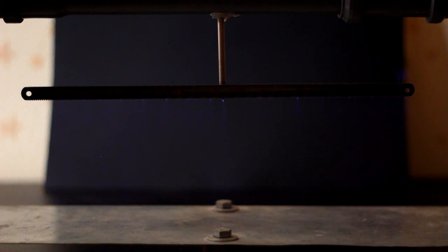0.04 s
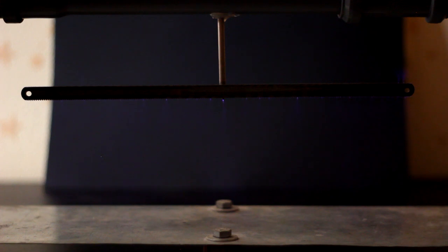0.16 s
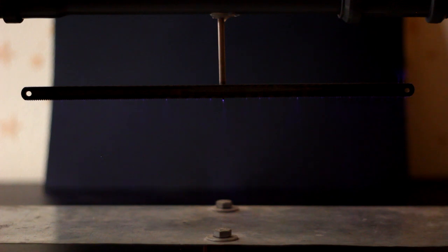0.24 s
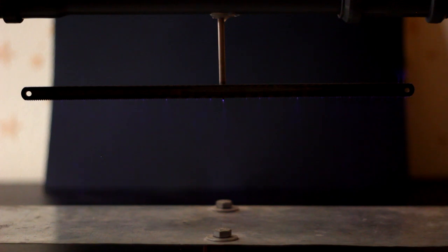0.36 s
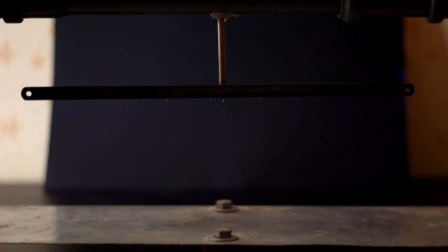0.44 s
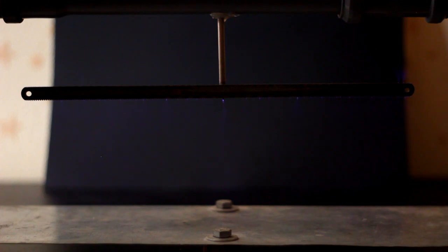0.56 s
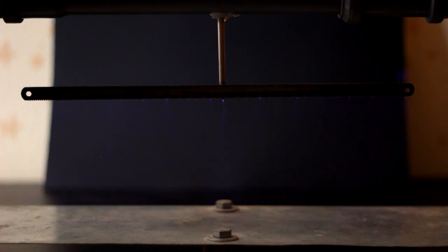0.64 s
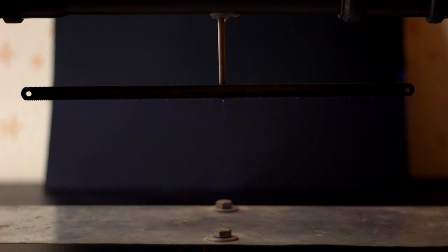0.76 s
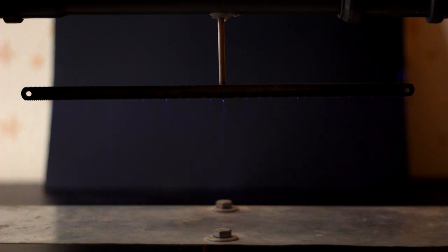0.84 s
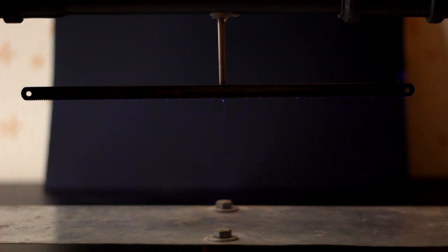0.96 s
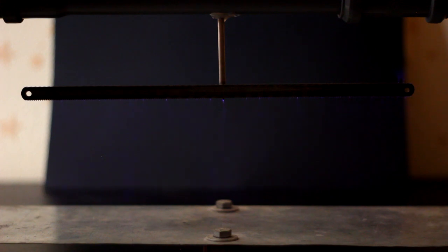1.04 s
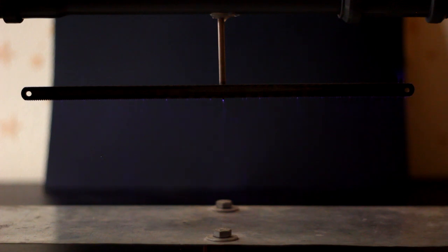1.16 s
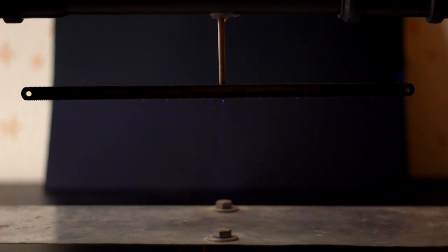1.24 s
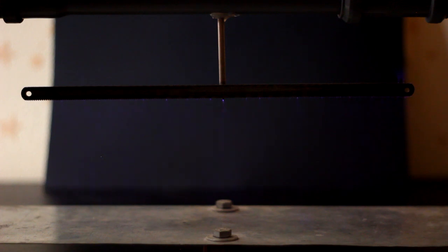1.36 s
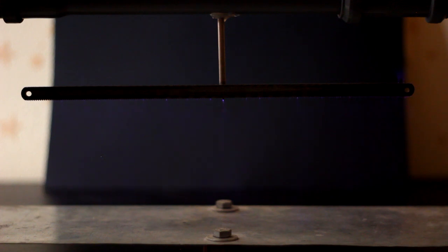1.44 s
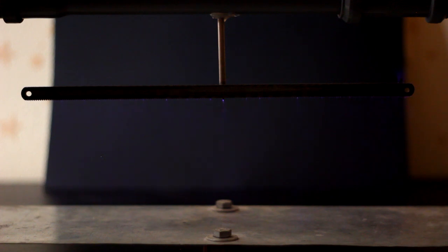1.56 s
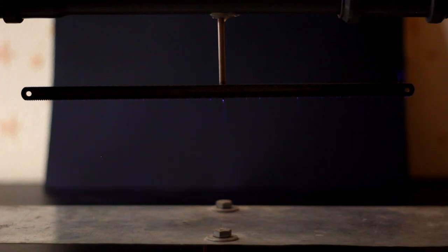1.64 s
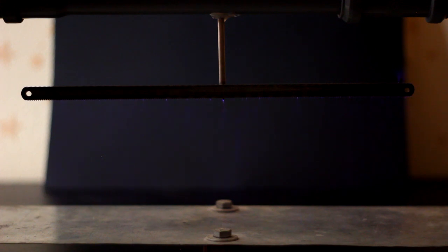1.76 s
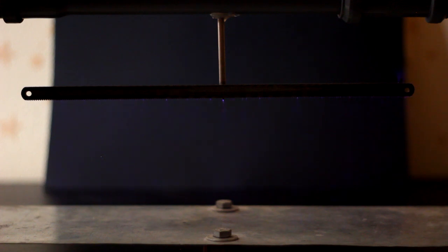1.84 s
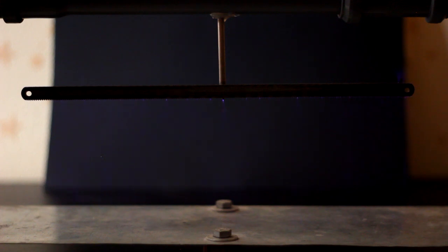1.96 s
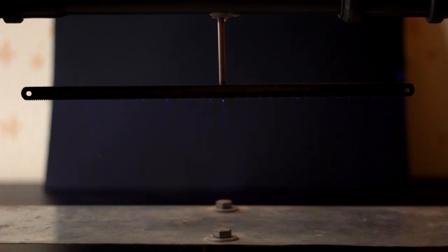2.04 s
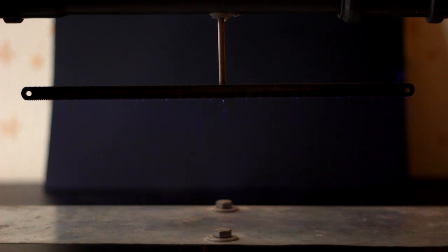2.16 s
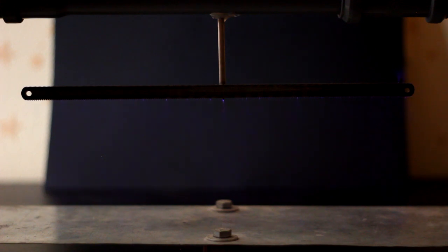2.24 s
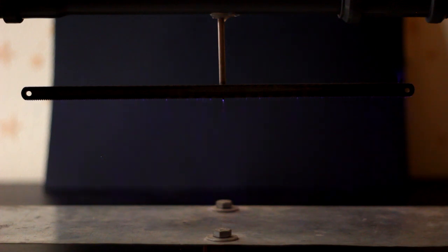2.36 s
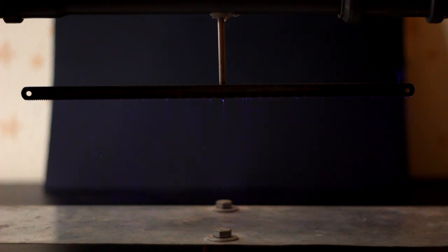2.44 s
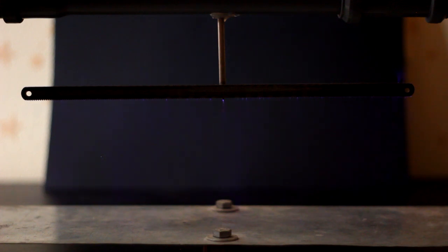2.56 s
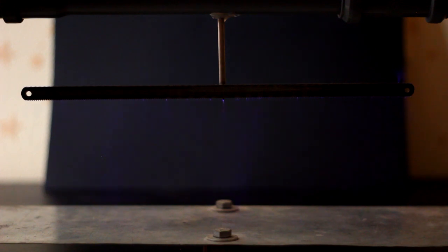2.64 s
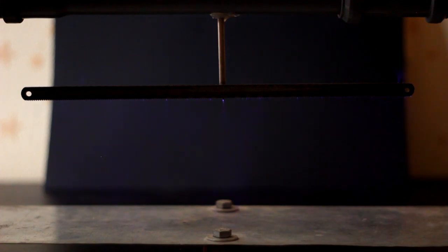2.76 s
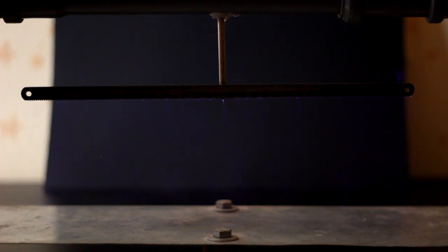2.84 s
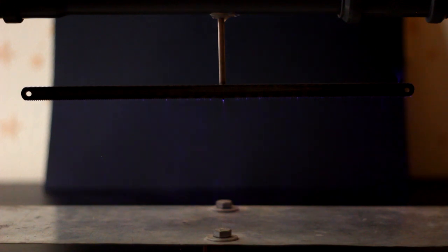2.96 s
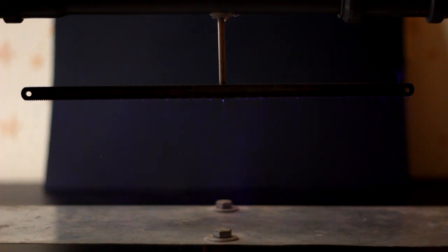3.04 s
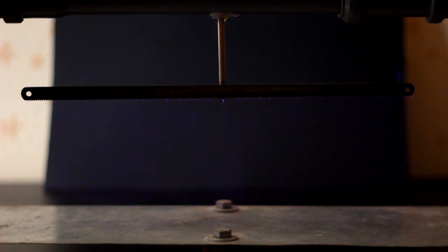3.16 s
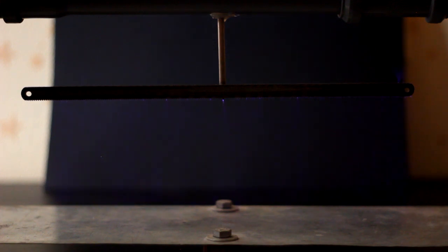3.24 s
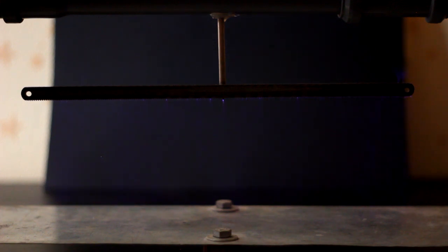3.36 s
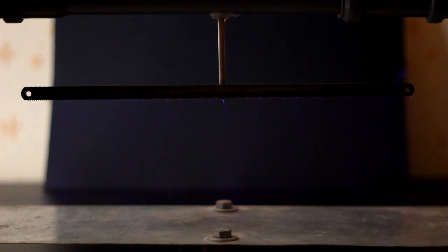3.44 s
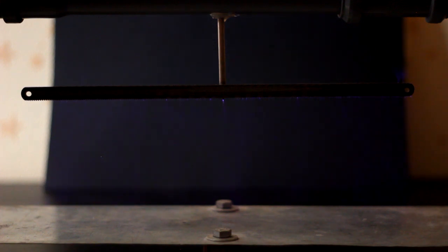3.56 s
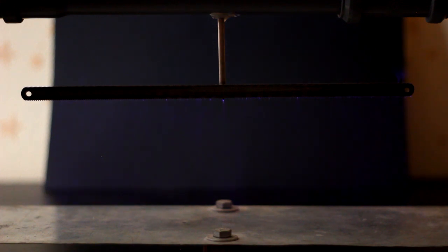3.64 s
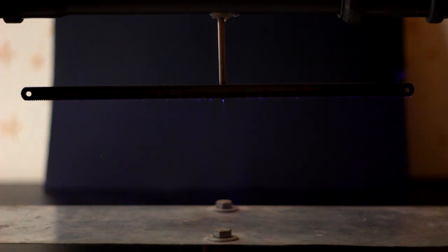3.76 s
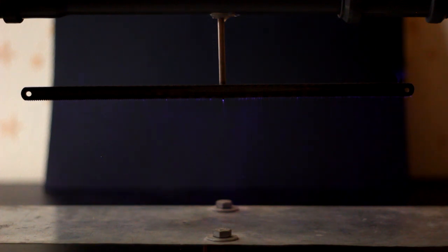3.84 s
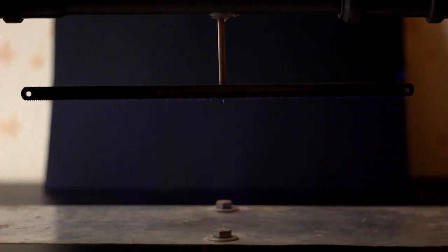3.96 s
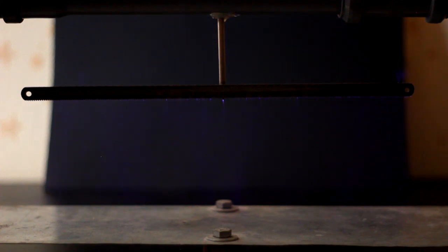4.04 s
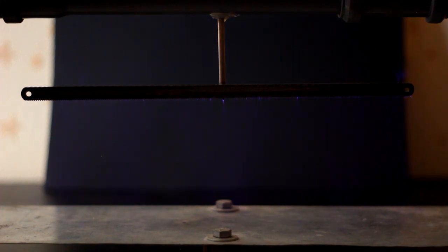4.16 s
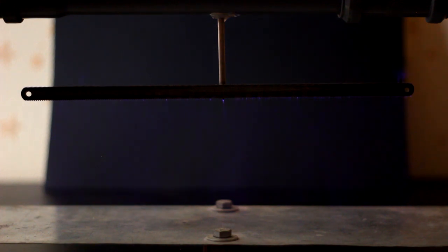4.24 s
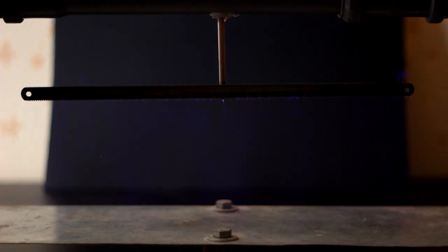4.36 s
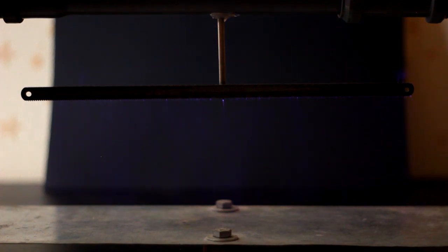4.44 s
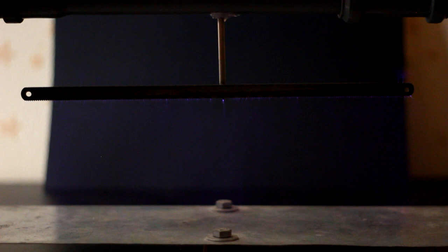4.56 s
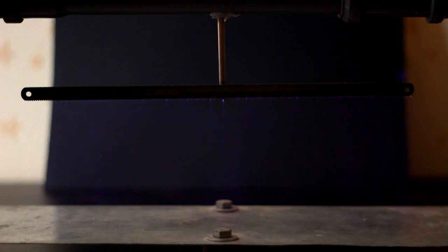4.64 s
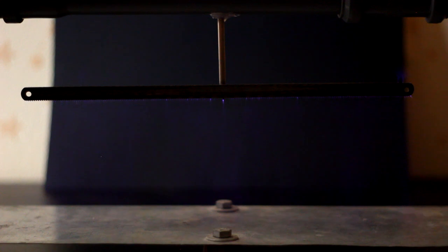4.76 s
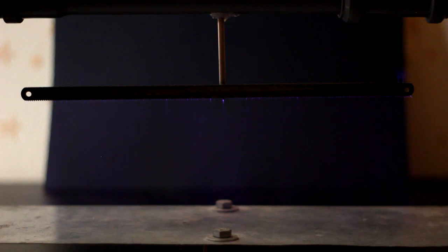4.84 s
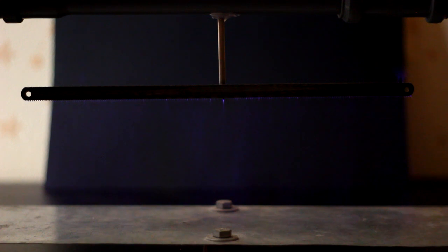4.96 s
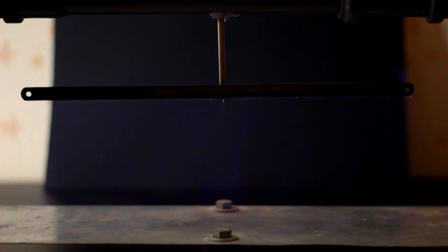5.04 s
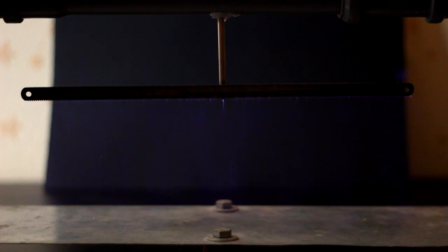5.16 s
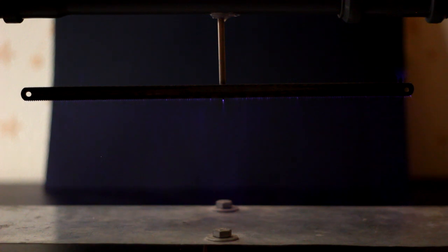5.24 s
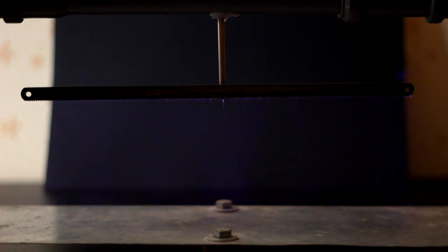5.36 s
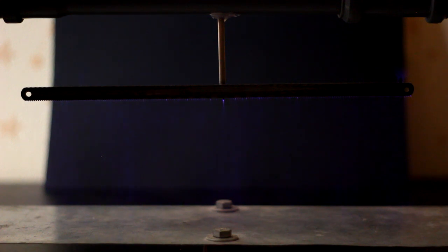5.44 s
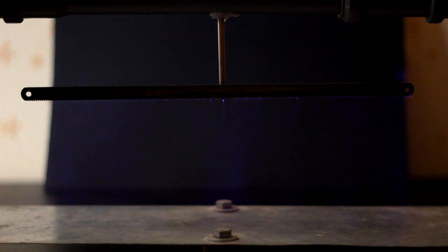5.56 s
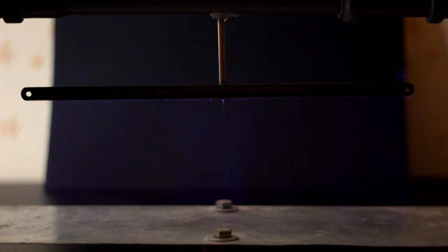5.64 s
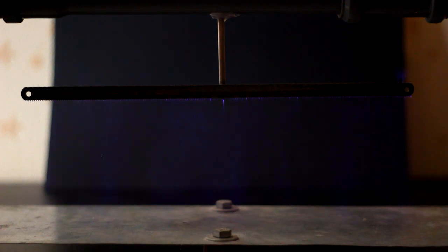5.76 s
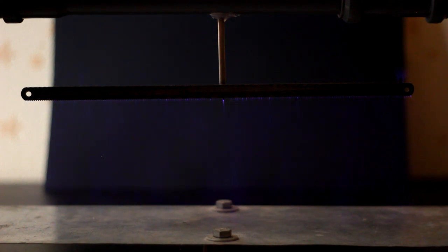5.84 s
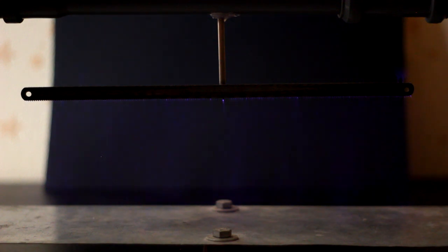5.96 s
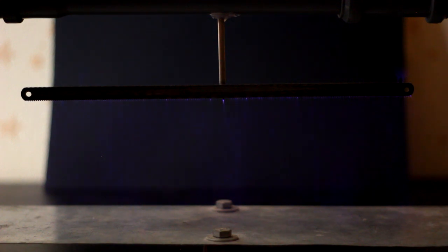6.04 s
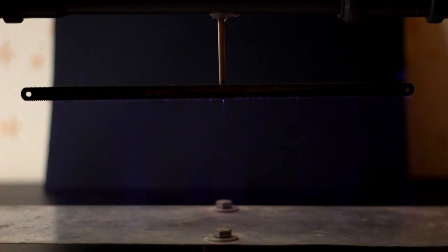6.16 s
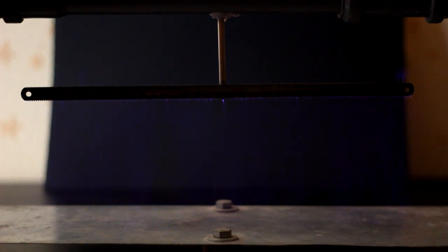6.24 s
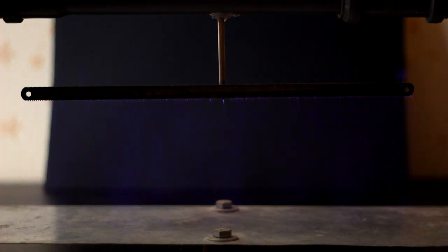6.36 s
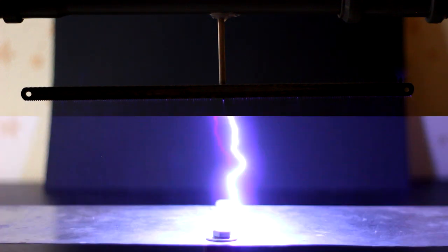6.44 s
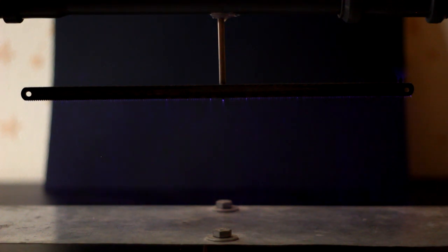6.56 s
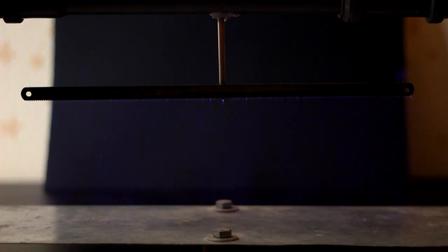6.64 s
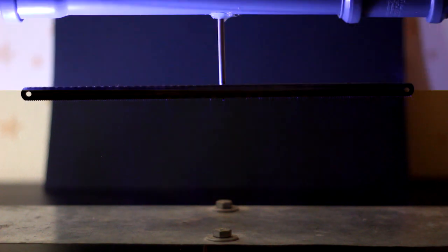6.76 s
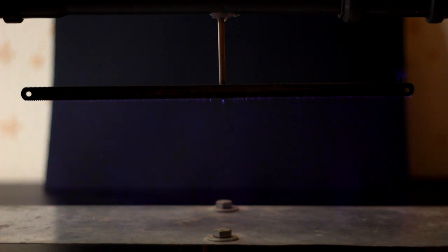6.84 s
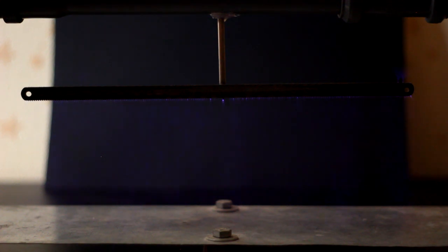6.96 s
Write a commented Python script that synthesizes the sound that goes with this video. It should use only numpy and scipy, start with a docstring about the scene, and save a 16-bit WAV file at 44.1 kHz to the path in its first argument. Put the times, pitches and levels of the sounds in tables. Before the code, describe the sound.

In a small workshop, a needle and saw blade at high voltage give off a continuous bright, gritty hiss, its crackle bunched into a fast mains buzz. Irregular dry snaps stick out several times a second. Near the end a very loud spark cracks, the hiss ducks and creeps back, and two more sharp cracks follow. One close microphone overloads on the sparks, with a short room splash.

```python
"""A small workshop at one microphone: corona hisses from a needle and a saw blade at high voltage.
From the start, hundreds of small discharges a second crowd on the crests of the rectified mains, over
a fine fizz; a few stronger streamers snap out, over a faint hum that slowly grows.
Near the end the gap sparks over three times: noise cracks, each on a pressure wave with a room splash,
overload the microphone, and its gain control ducks the hiss."""
import sys
import numpy as np
from scipy import signal
from scipy.io import wavfile

SR = 44100
rng = np.random.default_rng(int(sys.argv[2]) if len(sys.argv) > 2 else 0)


def generate_wav(sig):
    """Save sig (samples, or channels by samples) to the path in sys.argv[1] as 16-bit PCM at SR."""
    pcm = np.round(np.clip(np.atleast_2d(sig).T, -1, 1) * 32767).astype(np.int16)
    wavfile.write(sys.argv[1], SR, pcm)


N = 308567
TIME = np.arange(N) / SR  # s
RIPPLE_HZ, CREST_S = 100.02, .0015  # rate of the voltage crests, and about where the first one falls
DISCHARGES_PER_S = 400


def corona(bunching=1.25, spread_db=2.0, crackle_db=-2.0, fizz_db=-4.0, fizz_swing_db=2.0, fizz_hz=5000,
           wet_db=-6.0, teeth=16):
    """Well-spaced discharges crackle on each voltage crest over the fine fizz of the glow."""
    angle = 2 * np.pi * RIPPLE_HZ * (TIME - CREST_S)
    ripple = np.cos(angle) - .14 * np.sin(2 * angle)  # the supply charges fast and sags slowly

    # the gap must recharge between discharges, so every crest fires about as many
    current = np.exp(bunching * ripple)
    charge = np.cumsum(current / current.mean()) * DISCHARGES_PER_S / SR  # in discharges
    total = int(charge[-1])
    due = np.arange(total) + rng.random(total)
    firings = np.bincount(np.searchsorted(charge, due), minlength=N)
    crackle = firings * gain_of(spread_db * rng.standard_normal(N))

    fizz_filter = signal.butter(1, fizz_hz, fs=SR, output="sos")
    fizz = signal.sosfilt(fizz_filter, rng.standard_normal(N))
    fizz = fizz * gain_of(fizz_swing_db * ripple)

    strength = corona_strength()
    crackle = strength * gain_of(crackle_db) * evened(crackle)
    fizz = strength * gain_of(fizz_db) * evened(fizz)

    # each glowing tooth of the blade has its own paths through the room
    tooth = rng.integers(0, teeth, N)
    room = np.zeros(N)
    for k in range(teeth):
        room += through(crackle * (tooth == k), reverberation(build_s=0.023))
    return snapping(near_surfaces(crackle) + fizz + gain_of(wet_db) * room)


# Strength of the corona before the spark-overs, ahead of its colouring: (t/s, level/dB)
CORONA_LEVELS = [(0.0, -25.5), (0.26, -22.5), (0.31, -25.5), (0.45, -21.5), (0.6, -24.5), (1.22, -25),
                 (1.33, -22.5), (2.07, -25), (2.08, -22.5), (2.34, -23.5), (2.5, -21), (2.65, -23.5),
                 (3.95, -23.5), (4.09, -22.5), (4.57, -25), (5.14, -21.5), (5.33, -24), (6.19, -22.5)]


def corona_strength(wander_db=0.38, drained_db=-25, count=24):
    """The corona swells and wanders; once the gap begins to spark over it settles at a lower strength."""
    levels = list(CORONA_LEVELS) + [(SPARKS[0][0], drained_db)]
    db = np.interp(TIME, *np.transpose(levels))
    t = TIME[::256]  # the wander is slow enough for coarse steps
    wander = np.zeros(len(t))
    for hz in np.geomspace(2.5, 16, count):
        wander += np.sin(2 * np.pi * (hz * t + rng.random())) / np.sqrt(hz)
    return gain_of(db + wander_db * np.interp(TIME, t, evened(wander)))


# Further streamers break out by chance on the voltage crests
STREAMERS_PER_S, STREAMER_DB, STREAMER_SPREAD_DB = 10, -2.5, 2.5
# Streamers placed at set times, mostly strong, as impulses ahead of their colouring:
# (t/s, relative level/dB)
SET_STREAMERS = [(0.169, 1.5), (0.258, -8), (0.851, 0), (1.0396, 1), (1.7325, -1), (1.9105, -1),
                 (2.0926, -0.5), (2.2306, -1), (2.3223, 0), (2.5113, -1), (2.771, -3), (3.1002, 0),
                 (3.6708, 0), (4.712, 0), (5.022, -0.5), (5.773, 0), (6.1822, 0.5)]


def streamers(level_db=1, wet_db=-8, thud_db=-13, thud_growth=2.9, thud_hz=170):
    """Long streamers snap out until the first spark; the strongest also overload the microphone,
    which adds a faint low thud."""
    snaps = np.zeros(N)
    crests = np.arange(CREST_S, SPARKS[0][0], 1 / RIPPLE_HZ)
    for s, (chance, size) in zip(crests, rng.random((len(crests), 2))):
        if chance < STREAMERS_PER_S / RIPPLE_HZ:
            db = STREAMER_DB + STREAMER_SPREAD_DB * (2 * size - 1)
            add(snaps, s, gain_of([db]))
    for s, db in SET_STREAMERS:
        add(snaps, s, gain_of([db]))

    room = through(snaps, reverberation(build_s=0.013))
    heard = near_surfaces(snaps) + gain_of(wet_db) * room
    thud_filter = signal.butter(1, thud_hz, fs=SR, output="sos")
    thuds = signal.sosfilt(thud_filter, snaps ** thud_growth)  # overload grows faster than the snap
    return gain_of(level_db) * snapping(heard) + gain_of(thud_db) * thuds


# Colour of a spark: (f/Hz, level/dB)
SPARK_COLOUR = [(40, -40), (200, -21), (500, -6.5), (1000, 2), (2500, 1.5), (4500, 3), (8000, 4),
                (12000, 3.5), (16000, -5.5)]
# Spark-overs, with levels ahead of the microphone's overload:
# (t/s, crack level/dB, pressure wave level/dB, wave f/Hz, wave length/cycles, relative room level/dB)
SPARKS = [(6.2111, 7.5, 5, 527, 0.82, -7.5), (6.5320, 0, -16.5, 203, 0.77, -8.5),
          (6.82, 1.5, -7.5, 252, 0.75, -6.5)]


def sparks(crack_s=0.0011, room_db=36):
    """Each spark is a short harsh crack on a pressure wave, with the room's bright splash behind."""
    out, t, colour = np.zeros(N), TIME[:SR // 2], click(SPARK_COLOUR)
    for s, crack_db, wave_db, hz, cycles, splash_db in SPARKS:
        crack = gain_of(crack_db) * rng.standard_normal(len(t)) * np.exp(-t / crack_s)
        splash = gain_of(room_db + splash_db) * reverberation(build_s=0.0074)[:len(t)]
        # the hot channel pushes, then sucks back
        wave = np.sin(2 * np.pi * hz * t) * (hz * t < cycles)
        add(out, s, through(crack + splash, colour) + gain_of(wave_db) * wave)
    return out


# Transformer hum: (multiple of the ripple, level at the first spark/dB)
HUM_PARTIALS = [(1, -86.5), (2, -73), (5, -54), (6, -53), (7, -53), (10, -45)]


def supply(rumble_db=-88, rumble_hz=180, swell_db_per_s=1.3):
    """The transformer's faint hum grows until the first spark, over the still room's low rumble."""
    hum = np.zeros(N)
    for multiple, db in HUM_PARTIALS:
        hum += gain_of(db) * evened(np.sin(2 * np.pi * multiple * RIPPLE_HZ * TIME))
    swell = gain_of(swell_db_per_s * np.minimum(TIME - SPARKS[0][0], 0))
    rumble_filter = signal.butter(2, rumble_hz, fs=SR, output="sos")
    rumble = signal.sosfilt(rumble_filter, rng.standard_normal(N))
    return swell * hum + gain_of(rumble_db) * evened(rumble)


# Colour of one discharge: (f/Hz, level/dB)
DISCHARGE_COLOUR = [(40, -50), (150, -38), (300, -24), (500, -9), (800, -9.5), (1050, -1.5), (2000, -2.5),
                    (3700, -1), (4500, 1), (6500, -1), (9800, -2), (12000, -1), (14000, -1.5),
                    (16000, -5.5)]
# Resonances and dips of the bench and its frame: (f/Hz, width/Hz, level/dB)
BENCH_MODES = [(245, 28, 7), (295, 20, 3), (400, 30, 6), (503, 25, 6), (575, 45, 4), (706, 20, 3.5),
               (820, 30, -5), (877, 20, 7.5), (925, 25, -4), (992, 26, 8), (1121, 30, 6), (1277, 26, 3),
               (1383, 34, 4), (1647, 28, 2), (1745, 60, 3), (2008, 45, 3.5), (2251, 40, 2.5),
               (2688, 28, 2.5), (3011, 32, 2.5), (3159, 60, 2), (3274, 38, 2), (4188, 30, 2)]


def snapping(x, turn=0.81):
    """Gives each impulse the shape of a discharge: a sharp dip, a rebound, and the ring of the bench."""
    coloured = through(x, click(DISCHARGE_COLOUR, BENCH_MODES))
    return signal.lfilter([-turn, 1], [1, -turn], coloured)  # all-pass: turns phase, keeps the colour


# Nearby surfaces, on paths some 0.6 to 1.2 m longer than the direct one: (delay t/s, gain)
SURFACES = [(.00168, 0.15), (.0028, 0.22), (.0035, 0.21)]


def near_surfaces(x):
    """The direct sound and its first reflections, each a delayed and weaker copy."""
    out = x.copy()
    for delay, gain in SURFACES:
        add(out, delay, gain * x)
    return out


# The workshop's decay: (f/Hz, time to fall 60 dB t/s)
ROOM_DECAY = [(200, 0.15), (1000, 0.18), (4000, .2), (9000, 0.21), (16000, 0.23)]


def reverberation(build_s, size=256):
    """A diffuse tail of unit energy: reflections pile up, then each band dies at its own speed."""
    hz, t, bands = signal.stft(rng.standard_normal(SR // 2), SR, nperseg=size)
    decay = gain_of(-60 * t / read(ROOM_DECAY, hz)[:, None])
    tail = signal.istft(bands * decay, SR, nperseg=size)[1]
    tail *= 1 - np.exp(-TIME[:len(tail)] / build_s)
    return tail / np.linalg.norm(tail)


def click(colour, modes=(), size=8192):
    """A causal impulse of unit energy with this colour and these resonances."""
    hz = abs(np.fft.fftfreq(size, 1 / SR))
    db = read(colour, hz)
    for f, width, lift in modes:
        db = db + lift / (1 + (2 * (hz - f) / width) ** 2)
    # minimum phase: the energy comes as early as the colour allows
    spectrum = np.exp(np.conj(signal.hilbert(np.log(gain_of(db)))))
    pulse = np.fft.ifft(spectrum).real[:size // 2]
    return pulse / np.linalg.norm(pulse)


def gain_of(db):
    """Decibels to amplitude."""
    return 10 ** (np.asarray(db) / 20)


def evened(x):
    """Scales to an rms of one."""
    return x / np.sqrt(np.mean(x ** 2) + 1e-20)


def read(points, hz):
    """Reads a spectrum on a log-frequency axis."""
    f, value = np.transpose(points)
    return np.interp(np.log(hz + 1), np.log(f + 1), value)


def add(mix, s, sound):
    """Mixes a sound in at time s."""
    part = mix[round(s * SR):][:len(sound)]
    part += sound[:len(part)]


def through(x, response):
    """Convolves, keeping the length."""
    return signal.oaconvolve(x, response)[:len(x)]


def scene():
    """Corona, streamers, sparks and supply at one microphone."""
    return (corona() + streamers() + sparks() + supply())[None]


def record(dry, threshold_db=-13, recovery_db_per_s=42, squeeze=1.0, sense_s=0.0029,
           bass_hz=55, treble_hz=13000, edge_hz=16150):
    """The microphone saturates on the sparks, gain control ducks and slowly recovers; then the band limit."""
    saturated = dry / (1 + (dry[0] / .95) ** 6) ** (1 / 6)  # bends towards a ceiling of 0.95
    passband = signal.butter(2, [bass_hz, treble_hz], "band", fs=SR, output="sos")
    voiced = signal.sosfilt(passband, saturated)

    # the sensed level jumps up with the sound and falls back at a steady rate
    r = np.exp(-1 / (sense_s * SR))
    power = signal.lfilter([1 - r], [1, -r], voiced[0] ** 2)
    power_db = 10 * np.log10(power + 1e-12)
    fall_db = TIME * recovery_db_per_s
    held_db = np.maximum.accumulate(power_db + fall_db) - fall_db
    over_db = np.maximum(held_db - threshold_db, 0)
    cut_db = squeeze * signal.lfilter([1 - r], [1, -r], over_db)
    ducked = voiced / gain_of(cut_db)

    low_pass = signal.firwin(401, edge_hz, window=("kaiser", 9), fs=SR)
    return signal.oaconvolve(np.clip(ducked, -1, 1), low_pass[None], "same")


dry = scene()
out = record(dry)
generate_wav(out)
```